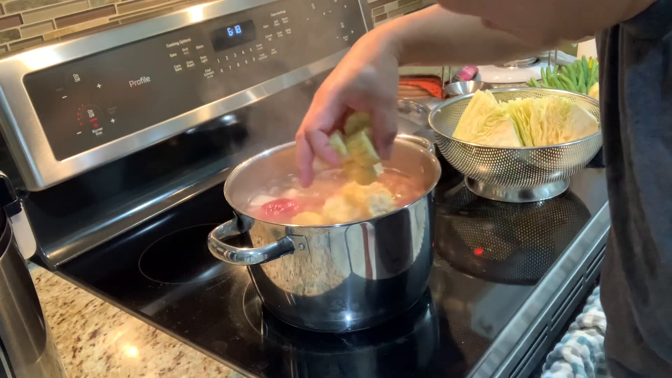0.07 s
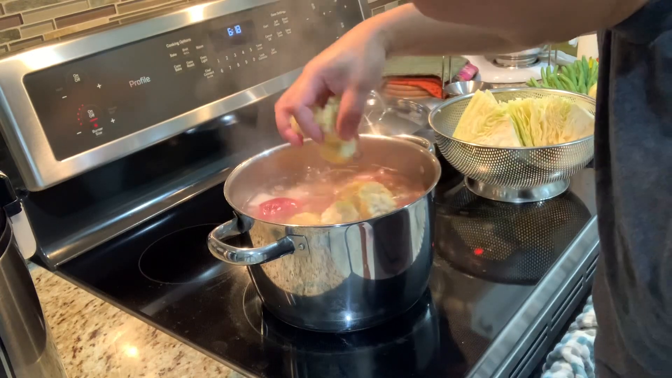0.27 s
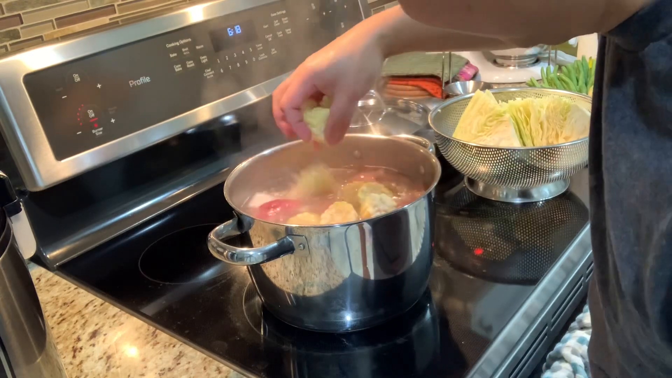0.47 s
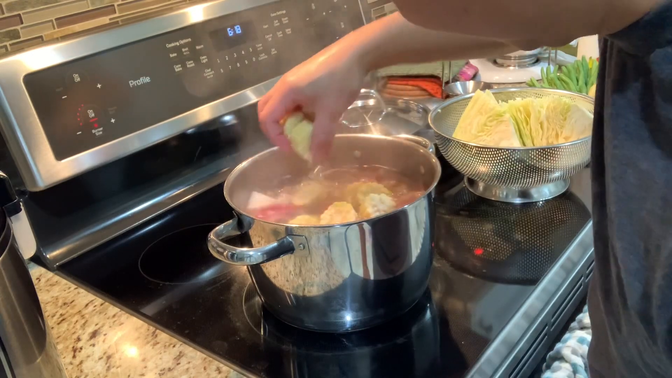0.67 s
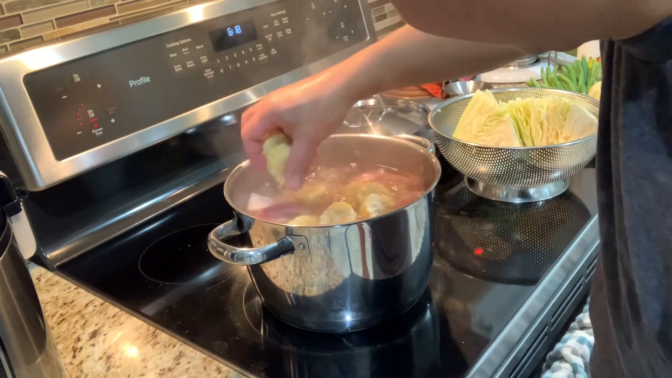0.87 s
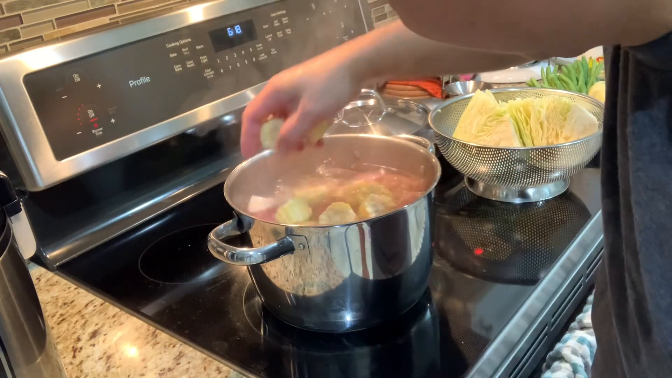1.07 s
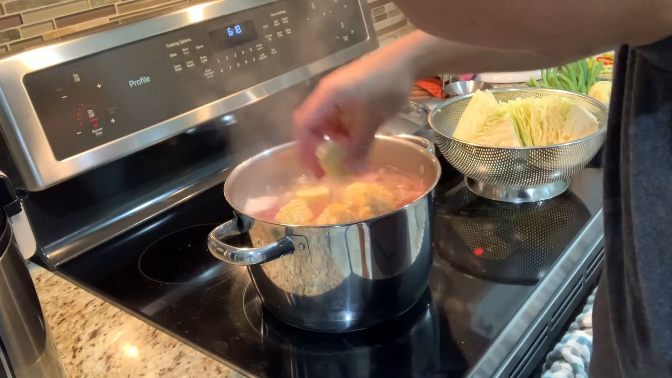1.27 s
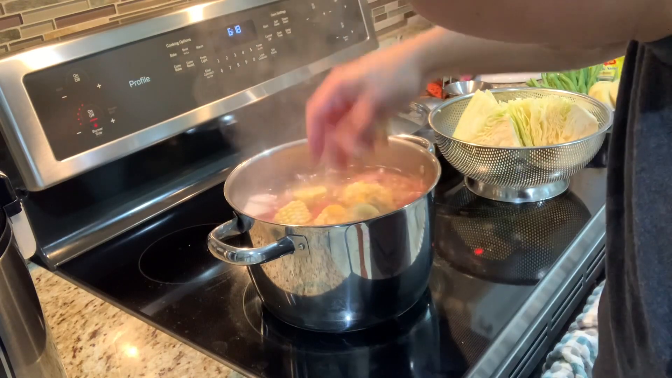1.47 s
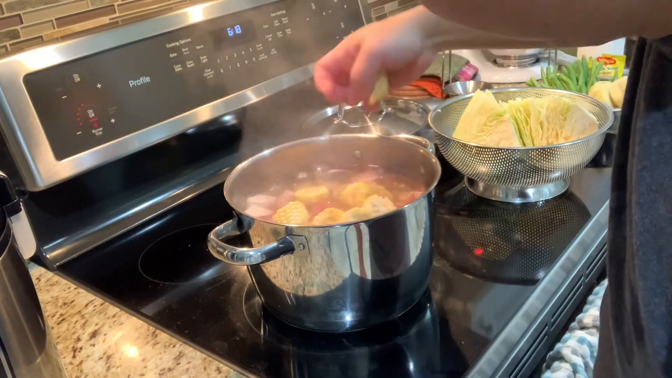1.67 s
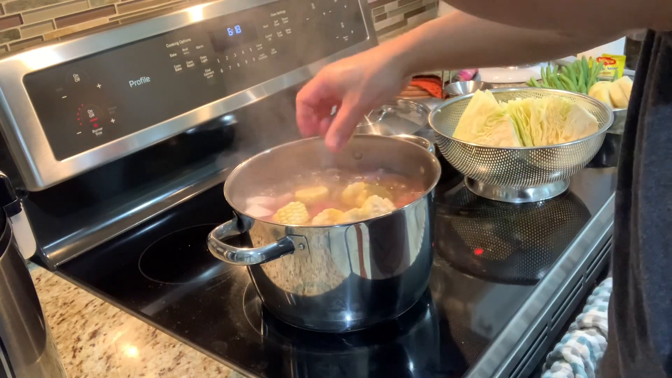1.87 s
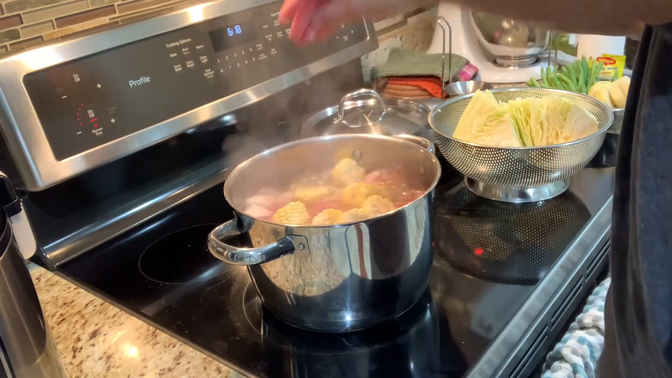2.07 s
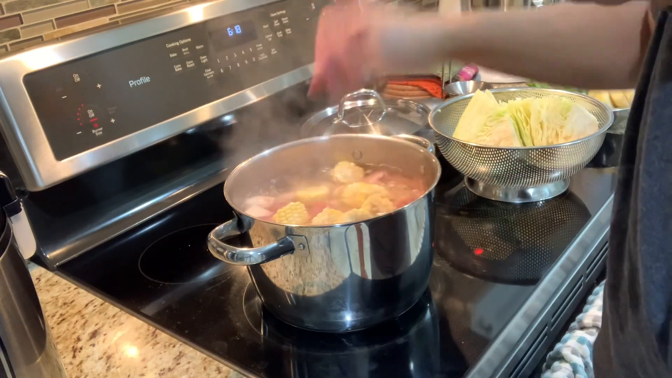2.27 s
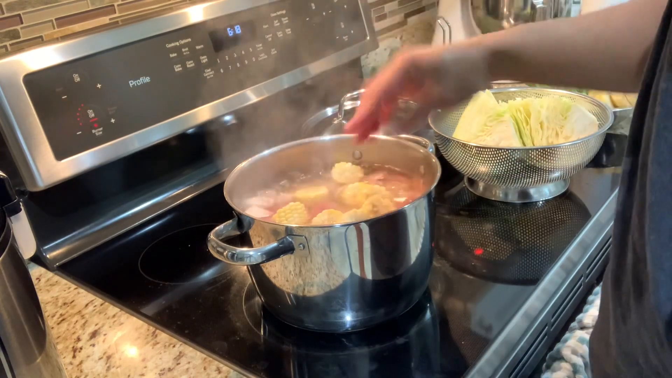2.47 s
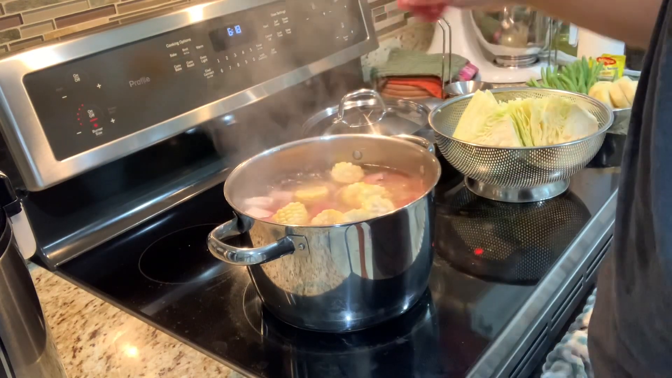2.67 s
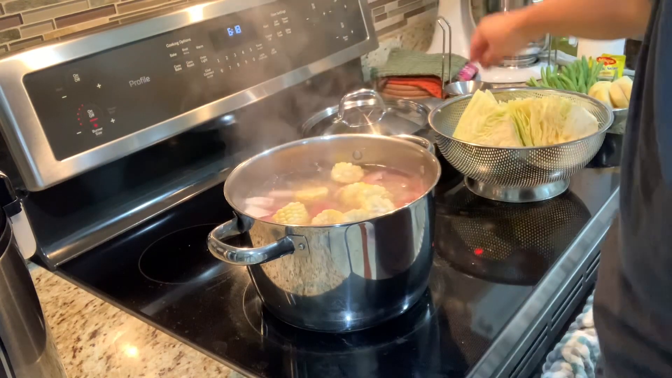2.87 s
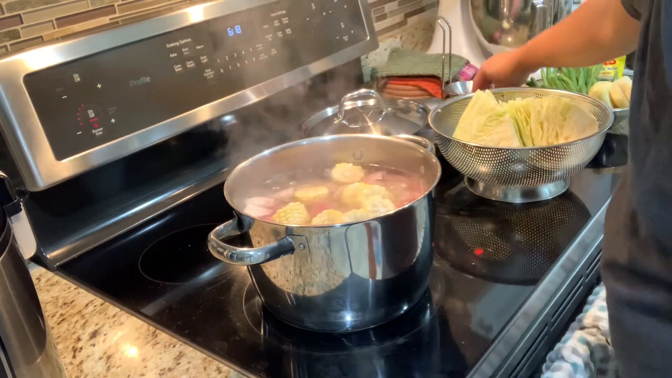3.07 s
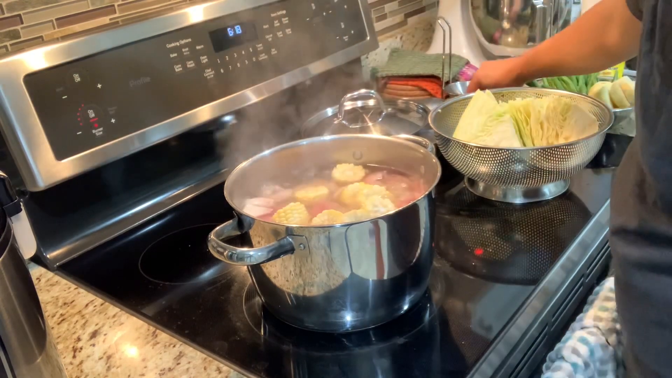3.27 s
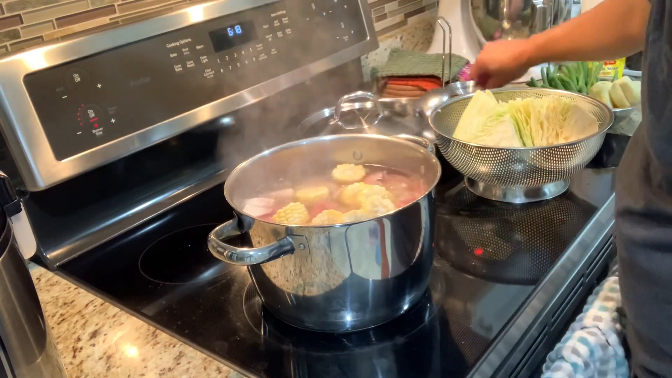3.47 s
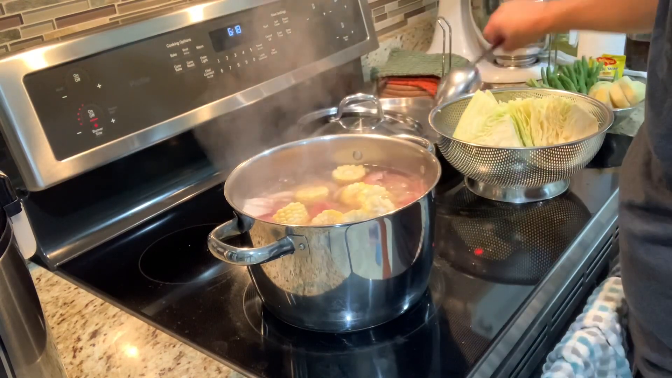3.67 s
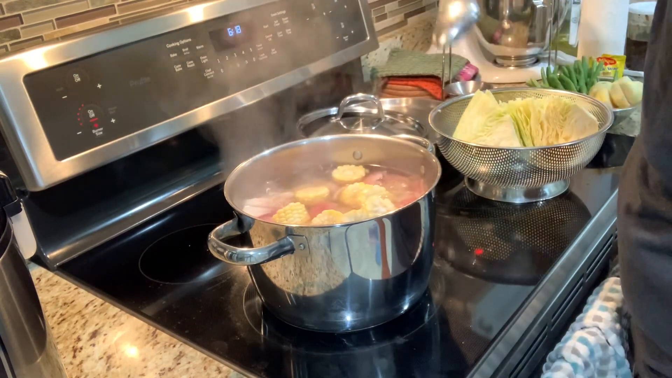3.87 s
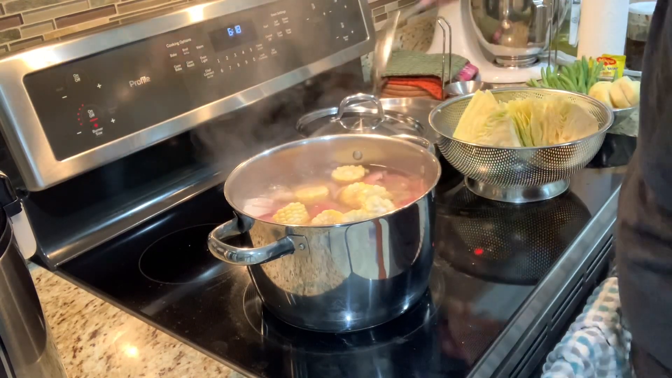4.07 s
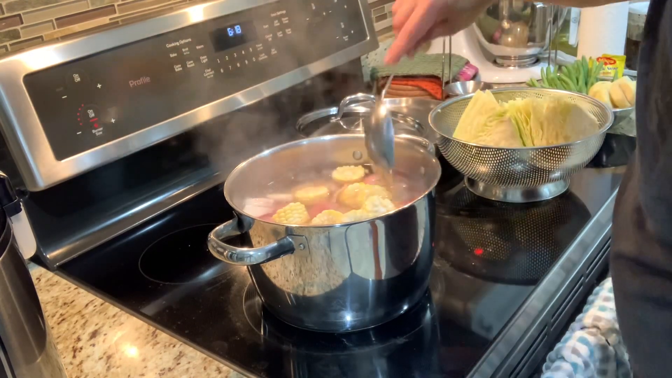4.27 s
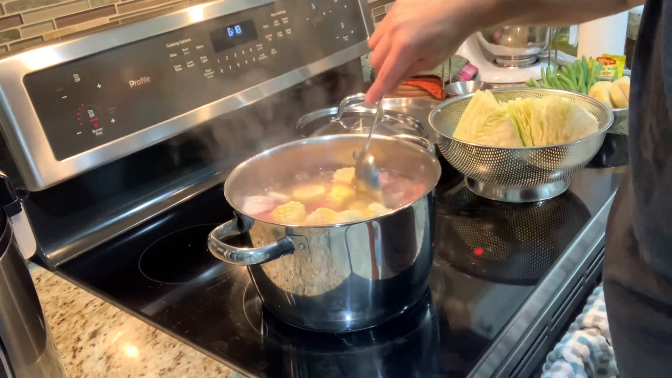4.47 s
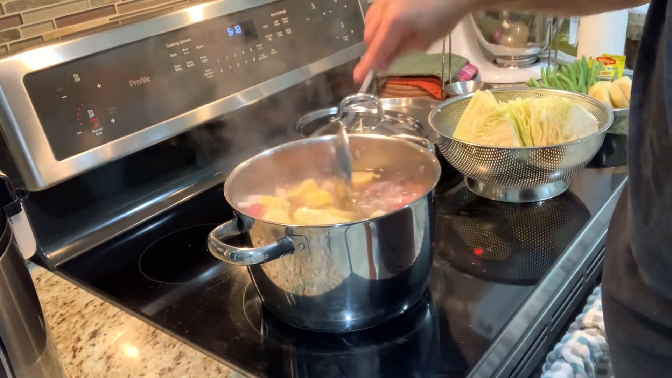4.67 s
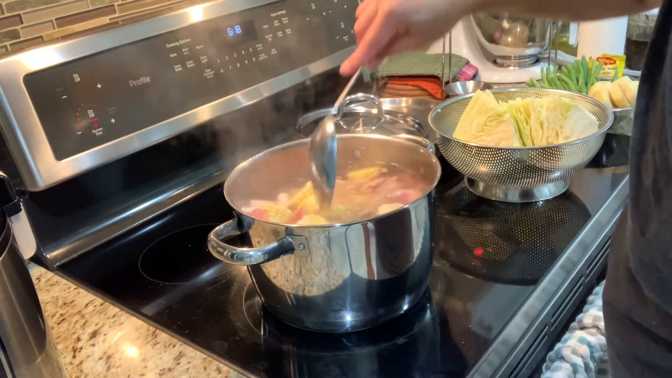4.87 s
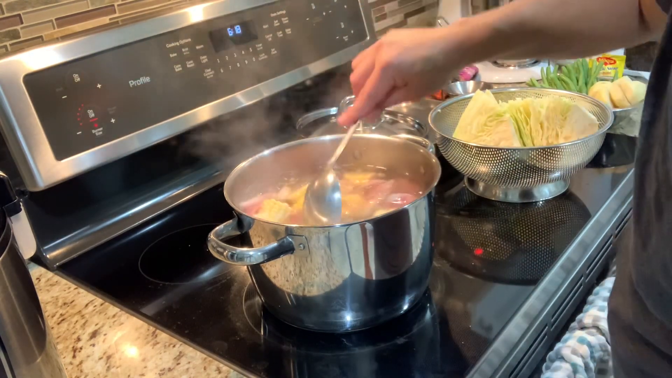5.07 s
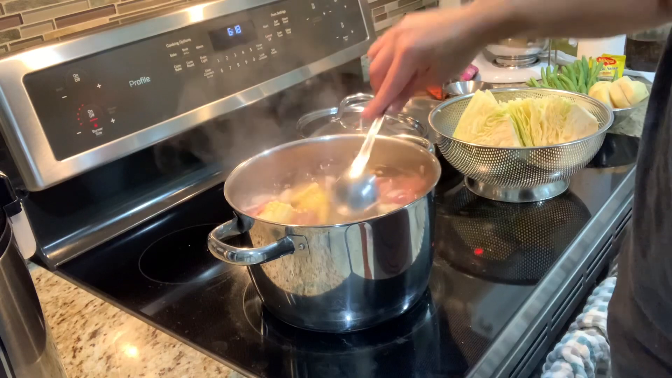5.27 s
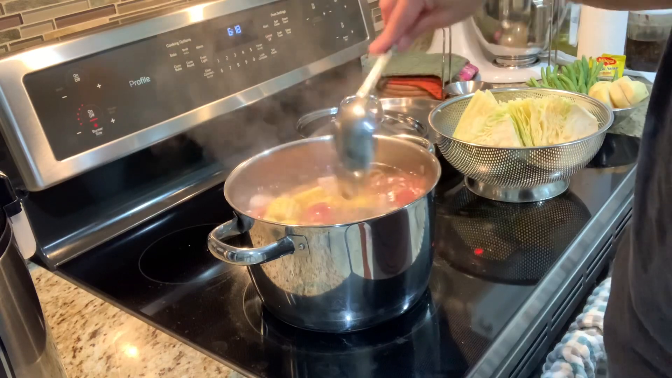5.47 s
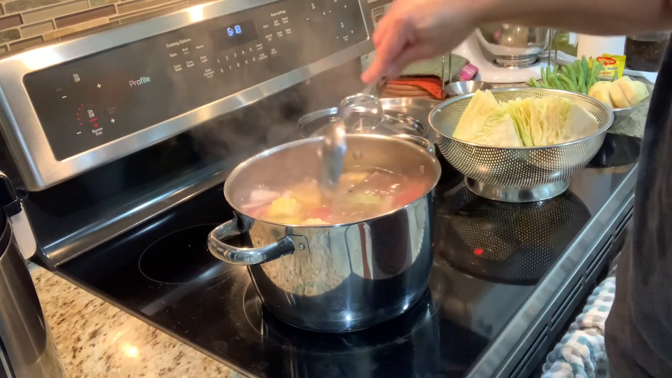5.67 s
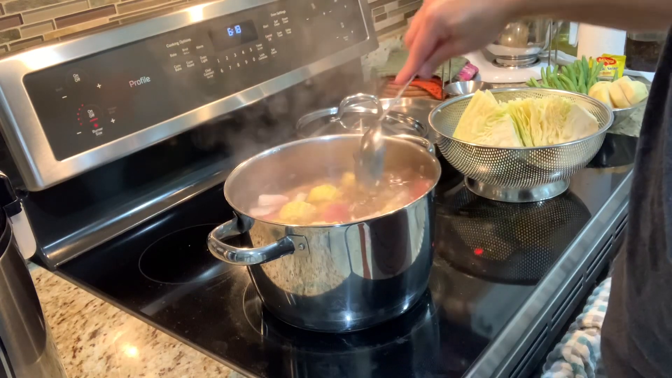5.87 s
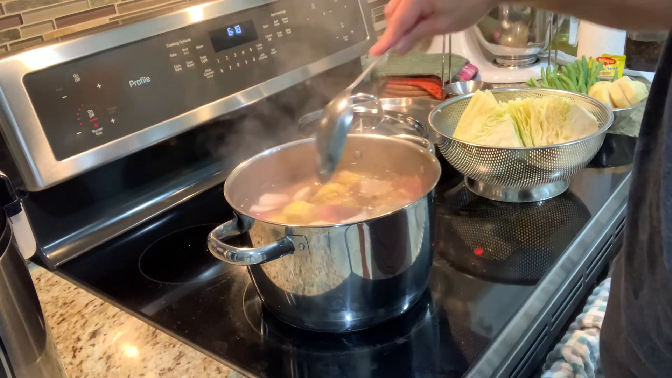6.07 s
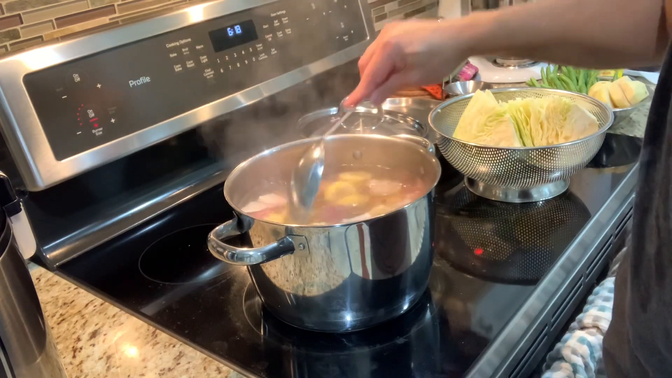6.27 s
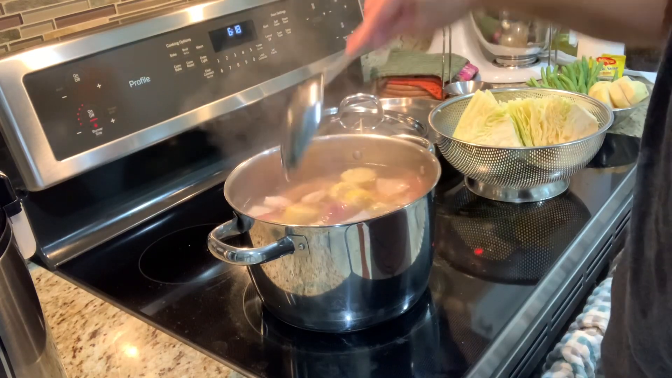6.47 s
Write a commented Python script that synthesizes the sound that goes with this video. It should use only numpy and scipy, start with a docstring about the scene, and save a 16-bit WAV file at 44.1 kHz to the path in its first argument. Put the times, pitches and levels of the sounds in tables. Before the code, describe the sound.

In a small kitchen, pieces of corn drop into a nearby pot of gently boiling broth, making several light plops over quiet bubbling and ticking. Then a metal spoon is dragged from its rest: a rising scrape, a sharp squealing clink with a few knocks on the counter, and a short ring. This is by far the loudest moment. Afterwards the spoon dips into the broth with small sloshes while the simmering carries on.

```python
"""Broth simmers in a steel pot in a small kitchen: steam bubbles rumble, fizz and spit over the stove's hum.
For the first two seconds pieces of corn plop in, throwing spray and trapping bubbles that ring.
At 3 s a large metal spoon is dragged off its rest behind the pot: tiny slips make it scrape, then lock
into a loud squeal, and it rings as it lifts while the rest knocks on the counter.
From about 4.2 s the spoon pushes the corn under, with small sloshes and drips."""
import sys
import numpy as np
from scipy import signal
from scipy.fft import rfft, irfft
from scipy.io import wavfile
from scipy.ndimage import uniform_filter1d

SR = 44100
rng = np.random.default_rng(int(sys.argv[2]) if len(sys.argv) > 2 else 0)


def output_pcm(signal):
    """Save a mono or channel-first signal as 16-bit PCM at the path in sys.argv[1].

    Samples are clipped to [-1, 1] before scaling.
    """
    pcm = np.clip(np.atleast_2d(signal).T, -1, 1) * 32767
    wavfile.write(sys.argv[1], SR, np.round(pcm).astype(np.int16))


N = 287158
TIME = np.arange(N) / SR

# corn and spoon entering the broth: start_s, level_db, fade_s, spray_db
SPLASHES = [(0.357, -58, 0.029, 1.5), (0.399, -69, .012, -3), (0.433, -61, 0.012, -0.5),
            (0.471, -85, 0.028, -2), (0.8745, -54.5, 0.02, -13), (0.904, -65, 0.022, -5),
            (0.936, -55, 0.0095, -3), (0.966, -64, 0.015, 2), (1.334, -57, 0.018, 3),
            (1.401, -68.5, 0.0086, 15.5), (1.776, -52.5, 0.0023, 3.5), (1.842, -53.5, 0.034, 0),
            (1.857, -61.5, 0.0043, 25), (1.923, -62.5, 0.014, 8), (2.136, -72.5, 0.035, -6),
            (4.337, -71.5, 0.061, 1), (4.904, -71, 0.019, -19), (5.154, -81, 0.041, 16),
            (5.461, -62.5, 0.064, -16), (5.7, -71.5, 0.018, 18), (5.730, -68, 0.012, 8),
            (5.846, -71, 0.011, -21), (6.33, -74.5, 0.026, -22)]
# wet body of a splash: freq_hz, level_db
SPLASH_EQ = [(200, -16), (700, -9.5), (1000, -1.5), (1450, -2), (2100, -4.5), (3000, -9.5), (6000, -14),
             (12000, -41.5)]
# bright spray on top of it: freq_hz, level_db
SPRAY_EQ = [(800, -36), (2500, -4.5), (4000, -2.5), (6500, 3.5), (8000, 0), (11500, 1), (14000, 1),
            (16000, -37)]
# drops and single bubbles: start_s, level_db, pitch_hz
DRIPS = [(0.0214, -58.5, 3750), (0.4707, -59, 1010), (0.58, -60, 3540), (0.639, -66.5, 1440),
         (0.7393, -56.5, 4000), (0.7866, -66, 1770), (0.875, -46.5, 1400), (0.9385, -51.5, 1300),
         (1.071, -57, 4150), (1.6314, -71, 1510), (1.727, -55, 1510), (2.0188, -61, 3900),
         (2.087, -61.5, 3260), (2.287, -60, 4100), (2.4063, -61, 3620), (2.4456, -55.5, 4200),
         (2.6993, -53, 5440), (2.808, -58, 4700), (5.0434, -56, 5850), (5.2024, -55.5, 5300),
         (5.2949, -58.5, 3230), (5.6254, -65, 2656), (5.8475, -62, 992), (6.2464, -66, 3457)]
# flurries of like-sized droplets: start_s, level_db, pitch_hz, fade_s
FLURRIES = [(0.183, -62.5, 12000, 0.036), (4.2, -64, 11000, 0.018), (4.788, -66.5, 11460, 0.04),
            (5.101, -67.5, 12960, 0.018), (5.366, -56.5, 4000, 0.012), (5.432, -66, 7760, 0.012),
            (6.112, -70, 10320, 0.024)]

# strokes of the spoon over its rest, first touch to final skid: start_s, rise_s, hold_s, pressure_db, grit_db
STROKES = [(2.994, 0.0052, 0.026, -74, -72), (3.021, 0.0034, 0.028, -66, -59.5),
           (3.121, 0.049, .17, -52, -63), (3.18, 0.023, 0.016, -46, -69), (3.255, .03, .075, -47, -57),
           (3.323, 0.036, 0.067, -46, -29), (3.383, .015, 0.019, -28.5, -35.5),
           (3.43, .015, 0.03, -40, -37), (3.467, 0.0048, 0.029, -18, -18)]
# resonances of the spoon lying on its rest: freq_hz, width_hz, level_db
SPOON_BODY = [(620, 17, -17), (800, 70, -6), (1441, 55, -1.5), (1569, 60, 1), (2056, 50, -15),
              (2350, 46, -20), (3760, 60, -23)]
# higher resonances that its edge excites: freq_hz, width_hz, level_db
SPOON_EDGE = [(2560, 64, -10), (3344, 35, 4), (4170, 100, 6), (4700, 150, 2.5), (6470, 660, -1.5),
              (8230, 69, 4), (9610, 80, -4.5), (11060, 610, -2), (11300, 80, -3)]
# gritty hiss of the edge: freq_hz, level_db
GRIT_EQ = [(100, -25), (300, -29), (600, -22), (1000, 6), (2000, 4), (3200, -1), (4500, -1), (7000, -1),
           (9000, 0), (12000, 0.5), (14500, -6.5), (16000, -26)]
# stick-slip squeals as the spoon skids off: start_s, length_s, level_db, pitch_hz
SQUEALS = [(3.4697, 0.0053, -19, 1575), (3.479, 0.018, -16.5, 1584), (3.496, 0.0043, -18, 1590),
           (3.5004, 0.0082, -11, 1618)]
# knocks of the rest on the counter: start_s, level_db
KNOCKS = [(3.028, -53.5), (3.475, -16.5), (3.500, -18), (3.588, -31.5)]
# modes of the rest and counter: pitch_hz, level_db, t60_s
REST_MODES = [(62, -7.5, 0.38), (107, -15.5, .2), (175, -14, .14), (445, -7, 0.22), (560, -9.5, 0.2),
              (618.7, 7, 0.062), (835, -7, 0.065), (855, -1.5, 0.065), (1206, -3, 0.2), (1958, -6, 0.4),
              (2240, -9, .22), (3460, -5, .12)]
# free ring of the lifted spoon: pitch_hz, level_db, t60_s
SPOON_MODES = [(1470, -35.5, 0.55), (1690, -37.5, 0.48), (2880, -50, .55), (3540, -51, 0.81),
               (4600, -38, 0.61), (4856, -41.5, .8), (4470, -50.5, 0.31), (11510, -66.5, 1.4)]

# smooth swells as big steam bubbles heave the surface: centre_s, half_length_s, rumble_db, gurgle_db
HEAVES = [(0.034, 0.2, -58.5, -71), (0.404, 0.14, -68.5, -68.5), (0.894, 0.057, -63, -71.5),
          (1.285, 0.12, -64.5, -73.5), (1.976, 0.12, -58, -84), (2.23, 0.16, -69, -70.5),
          (2.436, 0.085, -57.5, -81), (3.246, 0.15, -58.5, -67), (4.051, .04, -63.5, -77),
          (4.364, 0.065, -56, -73), (4.5, 0.033, -62.5, -69.5), (4.812, 0.054, -59.5, -77.5),
          (4.983, 0.051, -57, -79), (5.2, 0.15, -66, -87), (5.58, 0.045, -57, -85), (5.696, .06, -62, -95),
          (6.013, 0.034, -56.5, -90), (6.149, 0.057, -66, -99), (6.43, 0.11, -64, -82)]
# low end of the boil: freq_hz, level_db
RUMBLE_EQ = [(25, -18), (45, -9.5), (62, 1), (85, -8.5), (135, 2.5), (200, -5.5), (290, -5.5), (400, -21),
             (700, -43)]
# its throaty mids: freq_hz, level_db
GURGLE_EQ = [(150, -23), (330, -2), (550, -1), (800, -8), (1300, -14), (2500, -27), (6000, -39)]
# its fizzy top: freq_hz, level_db
FIZZ_EQ = [(500, -30.5), (2000, -15), (4000, -11.5), (7500, -13), (10000, -6), (12500, -2.5), (14500, -2.5),
           (16000, -16)]
# fader ride on the fizz: time_s, level_db
FIZZ_RIDE = [(0, -75.5), (0.6, -72), (1.08, -67.5), (1.2, -75), (1.55, -79), (1.78, -67), (2.0, -75),
             (2.14, -66), (2.38, -76), (2.8, -72.5), (2.97, -81), (4.0, -83.5), (4.25, -72.5), (4.8, -75.5),
             (4.95, -86), (5.12, -73.5), (6.03, -78), (6.42, -70)]
# sharp spits of bursting bubbles: start_s, level_db
SPITS = [(0.359, -33), (0.552, -51.5), (0.662, -53), (0.9697, -43), (1.038, -42), (1.0825, -38),
         (1.1137, -45), (1.6752, -42.5), (1.7085, -41.5), (1.7446, -34.5), (1.7756, -36), (2.0717, -43.5),
         (2.7702, -48), (3.1156, -41), (4.5447, -42.5), (4.6626, -42.5), (5.237, -46.5), (5.7005, -30.5),
         (5.9, -44.5), (6.3228, -48.5)]
# bright snap of a spit: freq_hz, level_db
SPIT_EQ = [(1000, -23.5), (4000, -19.5), (7500, -15.5), (10000, -6.5), (12500, -3), (14500, -10),
           (16000, -7.5)]

# room tone of the kitchen: freq_hz, level_db
AIR_EQ = [(18, -37), (30, -8), (59, -2), (103, -6.5), (152, 1.5), (199, -12), (307, -15.5), (453, -19),
          (1780, -33), (2190, -33), (2690, -36), (3870, -32), (7000, -35.5), (9100, -68.5), (15400, -120)]
# stove hum: pitch_hz, level_db
HUM = [(150.7, -73), (2218, -96)]
# reverb time of the kitchen: freq_hz, t60_s
ROOM_T60 = [(100, 0.37), (500, 0.46), (1500, 0.5), (4000, 0.56), (8000, .38), (14000, .27)]

LIFT_S = 3.505  # the spoon leaves its rest
SAG_DB_PER_S, RELEASE_S = 69, 0.0083  # a stroke eases off while it lasts, then stops
RUMBLE_DB, GURGLE_DB, AIR_DB = -71, -85, -67.5  # steady beds under everything
TOP_HZ = 15200


def splashes(attack_s, bubbles_db, cycles, count=12):
    """Each entry into the broth throws a fading cloud of droplets and traps a few ringing bubbles."""
    body, spray, bubbles = np.zeros((3, N))
    t = TIME[:SR // 2]
    for s, db, fade_s, spray_db in SPLASHES:
        cloud = amp(db) * (1 - np.exp(-t / attack_s)) * np.exp(-t / fade_s)
        add(body, s, cloud)
        add(spray, s, cloud * amp(spray_db))
        for late, pitch, size in rng.random((count, 3)):
            ping = bubble(1150 * 3.5 ** pitch, cycles, glide=0.025)
            add(bubbles, s + 2 * late * fade_s, ping * size * amp(db + bubbles_db - 36 * late))
    body *= colour(grains(per_s=2600, spread_db=3.0), SPLASH_EQ)
    spray *= colour(grains(per_s=1400, spread_db=6.6), SPRAY_EQ)
    return body + spray + bubbles


def drips(gain_db, cycles):
    """Single drops fall back and ring a small bubble."""
    out = np.zeros(N)
    for s, db, hz in DRIPS:
        add(out, s, amp(db + gain_db) * bubble(hz, cycles, glide=0.01))
    return out


def flurries(spread):
    """Droplets of nearly one size patter down, so they ring in one band."""
    out, t = np.zeros(N), TIME[:SR // 4]
    for s, db, hz, fade_s in FLURRIES:
        band = signal.butter(2, [hz / (1 + spread), hz * (1 + spread)], "bandpass", fs=SR, output="sos")
        patter = unit(signal.sosfilt(band, rng.laplace(size=len(t))))
        add(out, s, amp(db) * patter * np.exp(-t / fade_s))
    return out


def scrape(rattle_db, edge_db, hiss_db):
    """Tiny slips, in uneven bursts, shake the spoon's resonances; its edge adds a gritty hiss."""
    pressure, edge = drag() * amp(rattle_db * walk(per_s=220))
    slips = grains(per_s=5000, spread_db=2.2) * pressure
    grit = grains(per_s=12000, spread_db=1.8) * edge
    body = low_cut(resonate(slips, SPOON_BODY), hz=450)
    bite = low_cut(resonate(grit, SPOON_EDGE), hz=1800)
    return body + amp(edge_db) * bite + amp(hiss_db) * colour(grit, GRIT_EQ)


def drag():
    """Pressure and grit envelopes of the spoon's strokes: each rises, eases off and lets go."""
    pressure, grit = np.zeros((2, N))
    for s, rise_s, hold_s, pressure_db, grit_db in STROKES:
        held_s = np.maximum(TIME - s - rise_s, 0)
        attack = np.clip((TIME - s) / rise_s, 0, 1) ** 2
        release = np.exp(-np.clip((held_s - hold_s) / RELEASE_S, 0, 20))
        envelope = attack * amp(-SAG_DB_PER_S * held_s) * release
        pressure = np.hypot(pressure, amp(pressure_db) * envelope)
        grit = np.hypot(grit, amp(grit_db) * envelope)
    return np.array([pressure, grit])


def squeal(wobble, overtone_db):
    """For some milliseconds the slips lock onto the spoon's bending mode."""
    out = np.zeros(N)
    for s, length_s, db, hz in SQUEALS:
        n = int(length_s * SR)
        waver = unit(uniform_filter1d(rng.standard_normal(SR // 10), size=60))[:n]
        phase = 2 * np.pi * np.cumsum(hz * (1 + wobble * waver)) / SR
        tone = np.sin(phase) + amp(overtone_db) * np.sin(2 * phase)
        add(out, s, amp(db) * unit(tone * signal.windows.tukey(n, .4)))
    return out


def clatter(knock_db, ring_db, turn_db):
    """The rest rocks on the counter; the spoon rings free, swelling and fading as it turns."""
    knocks, free_ring = np.zeros((2, N))
    knock = ring(REST_MODES)
    for s, db in KNOCKS:
        add(knocks, s, amp(db + knock_db) * knock)
    add(free_ring, LIFT_S, ring(SPOON_MODES))
    return low_cut(knocks, hz=69.8) + free_ring * amp(ring_db + turn_db * walk(per_s=19))


def simmer(rumble_db, gurgle_db, fizz_db, cluster_db):
    """Steam bubbles collapse on the pot's floor, heave the surface and burst in clusters of fine ticks."""
    rumble, gurgle = amp(RUMBLE_DB), amp(GURGLE_DB)
    for s, half_s, low_db, mid_db in HEAVES:
        swell = np.exp(-np.minimum(((TIME - s) / half_s) ** 2, 20))
        rumble = np.hypot(rumble, swell * amp(low_db + rumble_db))
        gurgle = np.hypot(gurgle, swell * amp(mid_db + gurgle_db))
    rumble *= colour(grains(per_s=730, spread_db=3.7), RUMBLE_EQ)
    gurgle *= colour(grains(per_s=700, spread_db=1.8), GURGLE_EQ)
    fizz = colour(grains(per_s=900, spread_db=6), FIZZ_EQ)
    ride_db = np.interp(TIME, *np.transpose(FIZZ_RIDE))
    fizz *= amp(ride_db + fizz_db + cluster_db * walk(per_s=29))
    return rumble + gurgle + fizz


def pops(db, spread_db, count=300):
    """Tiny bubbles snap all over the surface, each ringing for only a few cycles."""
    out = np.zeros(N)
    for when, pitch, softness in rng.random((count, 3)):
        snap = bubble(2600 * 5.3 ** np.sqrt(pitch), cycles=3, glide=.01)
        add(out, when * N / SR, amp(db - spread_db * np.sqrt(softness)) * snap)
    return out


def spits(gain_db, fade_s):
    """A film of broth snaps: a very short, bright tick."""
    out, t = np.zeros(N), TIME[:SR // 100]
    for s, db in SPITS:
        snap = colour(rng.standard_normal(len(t)) * np.exp(-t / fade_s), SPIT_EQ)
        add(out, s, amp(db + gain_db) * snap / np.abs(snap).max())
    return out


def kitchen(air_db, pan_db):
    """Still room air and the steady hum of the stove."""
    mid, side = (colour(rng.standard_normal(N), AIR_EQ) for _ in range(2))
    side = low_cut(side, hz=250)  # keeps the bass mono
    air = amp(AIR_DB + air_db) * (mid + .5 * side * np.array([[1], [-1]]))
    hum = sum(np.sqrt(2) * amp(db) * np.sin(2 * np.pi * hz * TIME) for hz, db in HUM)
    return pan(air + hum, pan_db)


def place(x, lag, pan_db, near_db, near_s, room_db, bands=14):
    """Direct sound, lag samples late on the left, quick echoes off nearby steel, and the kitchen's tail."""
    t = TIME[:int(.8 * SR)]
    hz = np.fft.rfftfreq(len(t), 1 / SR)
    mid, side = rfft(rng.standard_normal((2, len(t))))
    width = np.minimum(0.36 + hz / 2200, .9)  # long waves reach left and right nearly alike
    field = (mid + np.array([[1], [-1]]) * width * side) / np.sqrt(1 + width ** 2)
    centres = np.geomspace(80, 16000, bands)
    tail = 0
    for centre, weights in zip(centres, np.eye(bands)):
        band = irfft(field * on_log_axis(hz, np.c_[centres, weights]), len(t))
        tail = tail + band * np.exp(-np.log(1000) * t / on_log_axis(centre, ROOM_T60))
    tail *= 1 - np.exp(-t / 0.0032)  # the tail fades in
    near = irfft(field, len(t))[:, ::-1] * np.exp(-t / near_s)
    echoes = (amp(near_db) * unit(near) + amp(room_db) * unit(tail)) / np.sqrt(len(t))
    reverb = signal.fftconvolve(x[None], echoes, axes=1)[:, :N]
    direct = np.array([np.roll(x, lag), x])
    return pan(direct + reverb, pan_db)


def bubble(hz, cycles, glide):
    """A short ring whose pitch rises as the bubble nears the surface."""
    age = TIME[:int(6 * cycles / hz * SR)] * hz / cycles  # in decay times
    return np.exp(-age) * np.sin(2 * np.pi * cycles * age * (1 + glide * age))


def ring(modes):
    """Decaying sines of a struck object."""
    t = TIME[:SR]
    return sum(amp(db - 60 * t / t60) * np.sin(2 * np.pi * hz * t) for hz, db, t60 in modes)


def resonate(x, peaks):
    """Drive resonances with a force, keeping its power; narrow ones ring longer."""
    modes = [(hz, db + 20 * np.log10(width), np.log(1000) / (np.pi * width)) for hz, width, db in peaks]
    response = ring(modes)
    return signal.fftconvolve(x, response / np.linalg.norm(response))[:N]


def grains(per_s, spread_db):
    """Crackle: random clicks of very unequal size, rms 1."""
    size_db = spread_db * np.minimum(rng.exponential(size=N), 4)
    hits = rng.random(N) < per_s / SR
    return unit(hits * rng.choice([-1, 1], N) * amp(size_db))


def walk(per_s):
    """Random levels joined by straight lines."""
    return np.interp(TIME * per_s, np.arange(N), rng.standard_normal(N))


def colour(x, eq, size=4096):
    """Minimum-phase EQ, so clicks keep their attack; white noise keeps its power."""
    gains = amp(on_log_axis(np.fft.rfftfreq(size, 1 / SR), eq))
    cepstrum = irfft(np.log(gains))
    cepstrum[1:size // 2] *= 2
    cepstrum[size // 2 + 1:] = 0
    response = irfft(np.exp(rfft(cepstrum)))
    return signal.fftconvolve(x, response / np.linalg.norm(response))[:len(x)]


def low_cut(x, hz):
    """Thin out the bass below hz."""
    return signal.sosfilt(signal.butter(2, hz, "highpass", fs=SR, output="sos"), x)


def on_log_axis(hz, points):
    """Read a curve of freq_hz, value points at any frequency."""
    freq_hz, value = np.transpose(points)
    return np.interp(np.log(hz + 1), np.log(freq_hz), value)


def pan(stereo, db):
    """Tip the balance to the left by db."""
    return stereo * amp(np.array([[db], [-db]]) / 2)


def add(track, s, sound):
    """Mix a sound into a track at time s."""
    i = int(np.clip(s * SR, 0, N - 1))
    track[i:i + len(sound)] += sound[:N - i]


def amp(db):
    """Decibels to gain."""
    return 10 ** (np.asarray(db) / 20)


def unit(x):
    """Scale to rms 1."""
    return x / np.sqrt(np.mean(x ** 2) + 1e-30)


def scene():
    """The pot is close and dry; the spoon, hidden behind it, is heard largely through the room."""
    boil = simmer(rumble_db=-1.5, gurgle_db=-0.5, fizz_db=-2.5, cluster_db=6)
    boil += pops(db=-49.5, spread_db=18.0)
    boil = place(boil, lag=4, pan_db=2.4, near_db=-10, near_s=.005, room_db=-8)
    plops = splashes(attack_s=0.0014, bubbles_db=4.0, cycles=4.2)
    plops += drips(gain_db=5.5, cycles=2.6) + flurries(spread=0.15)
    plops = place(plops, lag=4, pan_db=-2.0, near_db=0.0, near_s=0.0081, room_db=-6.5)
    snaps = spits(gain_db=1.5, fade_s=0.00035)
    snaps = place(snaps, lag=4, pan_db=1, near_db=-9, near_s=.002, room_db=-14)
    spoon = scrape(rattle_db=1.5, edge_db=-9, hiss_db=0.0)
    spoon += clatter(knock_db=-9.0, ring_db=-3, turn_db=4.0)
    spoon = place(amp(-6.0) * spoon, lag=-2, pan_db=-0.6, near_db=2.5, near_s=.005, room_db=1.5)
    skid = squeal(wobble=0.042, overtone_db=-26.0)
    skid = place(skid, lag=-1, pan_db=-1.8, near_db=-13.0, near_s=0.0024, room_db=-11)
    return boil + plops + snaps + spoon + skid + kitchen(air_db=-2.0, pan_db=2.5)


def record(dry):
    """A steep high cut takes the very top off the mix."""
    return signal.sosfilt(signal.ellip(10, .2, 80, TOP_HZ, fs=SR, output="sos"), dry)


dry = scene()
out = record(dry)
output_pcm(out)
```